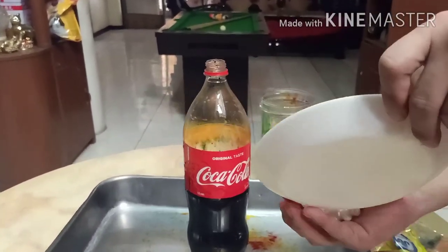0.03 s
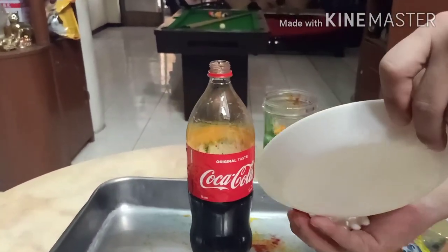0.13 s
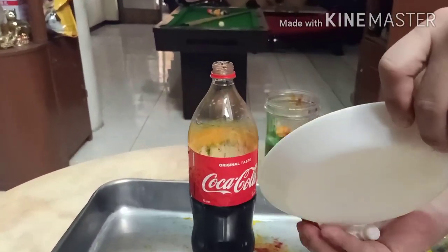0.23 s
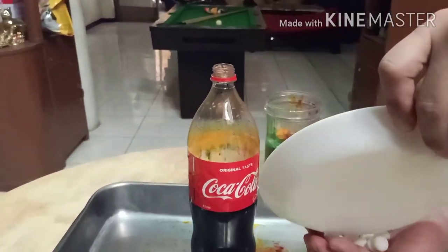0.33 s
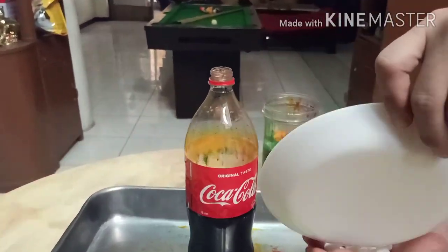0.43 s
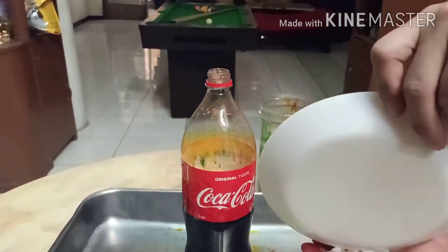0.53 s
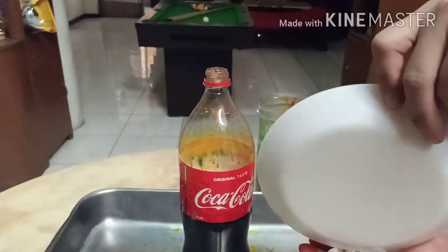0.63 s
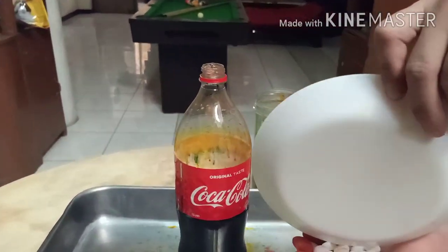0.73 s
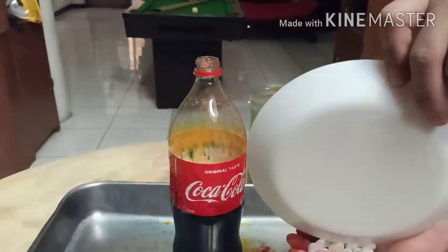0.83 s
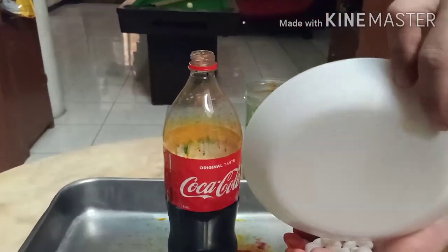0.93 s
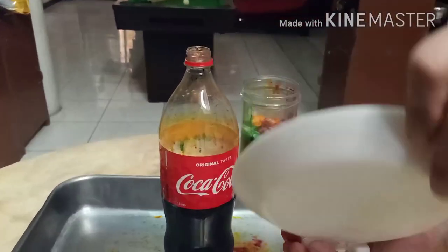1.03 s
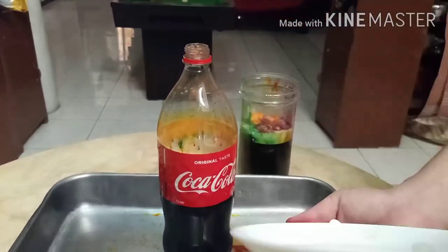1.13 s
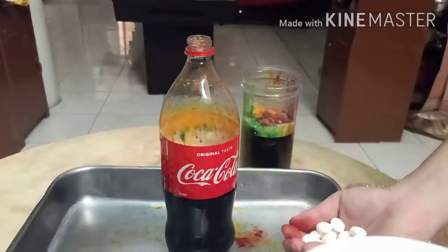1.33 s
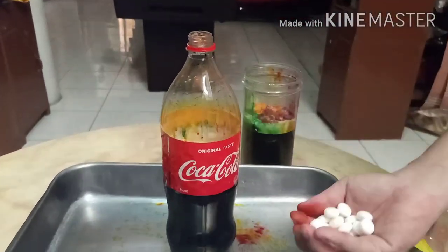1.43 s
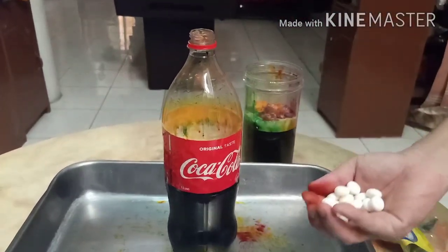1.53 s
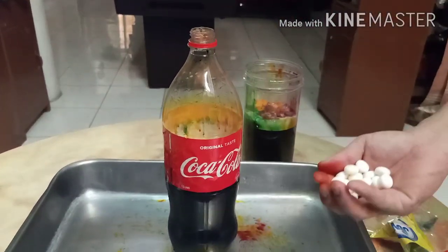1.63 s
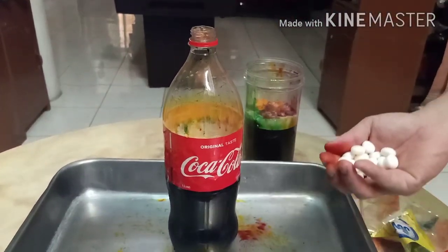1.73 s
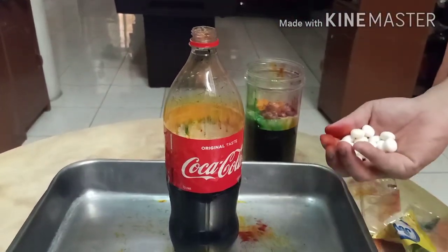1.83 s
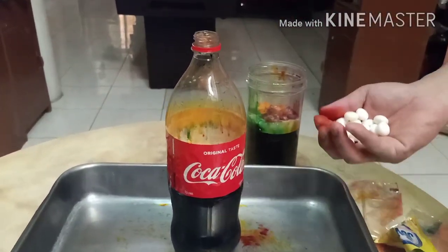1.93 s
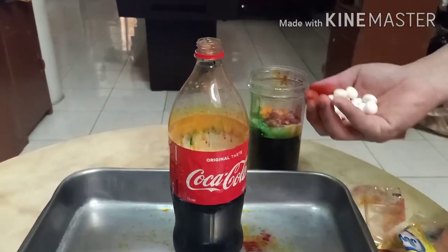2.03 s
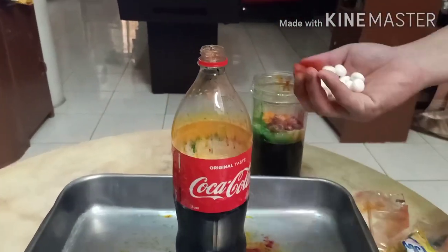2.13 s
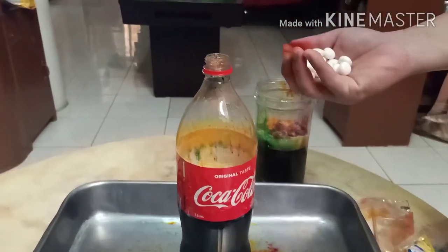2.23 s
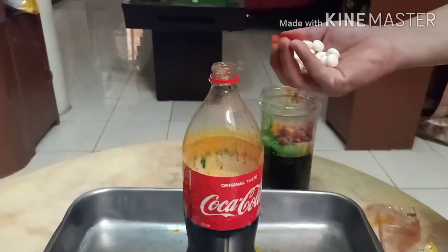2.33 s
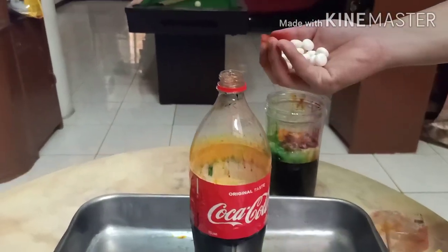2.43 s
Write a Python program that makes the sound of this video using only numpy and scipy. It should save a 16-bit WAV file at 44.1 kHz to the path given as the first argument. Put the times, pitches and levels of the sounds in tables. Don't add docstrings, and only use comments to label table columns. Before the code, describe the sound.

Small hard sweets slide and tick brightly against a hand-held ceramic plate, then the plate knocks onto a hard table and bounces; close stereo microphone in a tiled, echoing room with faint traffic rumble.

```python
import sys
import numpy as np
from scipy import signal
from scipy.fft import rfft, irfft
from scipy.io import wavfile
from scipy.ndimage import uniform_filter1d

SR = 44100
rng = np.random.default_rng(int(sys.argv[2]) if len(sys.argv) > 2 else 0)


def wrap_up_sound(samples):
    columns = np.atleast_2d(samples).T
    tamed = np.clip(columns, -1, 1)
    steps = np.round(tamed * 32767).astype(np.int16)
    wavfile.write(sys.argv[1], SR, steps)


def volts(x):
    e = np.asarray(x, float) / 20
    return 10 ** e


N = 108045
LAG_S, BEFORE_S = 0.0003, 0.05


def read(points, hz, axis=1):
    rows = np.transpose(points)
    return np.interp(np.log(hz + 1), np.log(rows[0] + 1), rows[axis])


def evened(x):
    return x / np.sqrt(np.mean(x ** 2) + 1e-20)


def empty_mix():
    return np.zeros((2, N + round(BEFORE_S * SR)))


def add(mix, s, sound):
    part = mix[:, round((s + LAG_S + BEFORE_S) * SR):][:, :sound.shape[1]]
    part += sound[:, :part.shape[1]]


# (frequency [Hz], likeness [0 to 1])
SAME = [(60, 0.96), (300, 0.92), (600, 0.66), (1200, 0.084), (15000, 0.021)]
# (frequency [Hz], left louder by [dB])
LEFT_DB = [(300, 0), (900, 0), (1650, 4), (3000, 3), (8000, 2)]


def pair(left, other, hz):
    same = np.clip(read(SAME, hz), 0, 1)
    tilt = volts(read(LEFT_DB, hz) / 2)
    right = same * left + np.sqrt(1 - same ** 2) * other
    return np.array([tilt * left, right / tilt])


def burst(colour, t60):
    t = np.arange(SR // 4) / SR
    hz = np.fft.rfftfreq(len(t), 1 / SR)
    noise = rfft(rng.standard_normal((2, len(t))))
    z = pair(*noise, hz) * volts(read(colour, hz))
    return evened(irfft(z, len(t))) * volts(-60 * t / t60) * np.minimum(t / 0.00013, 1)


def ring(modes, ports, spot_db, rise_s):
    grip_detune = 0.0057
    t = np.arange(SR // 4) / SR
    side = np.array([0.5, -0.5])[:, None, None]
    hz, db, t60 = np.transpose(modes)[:, :, None]
    chance = spot_db * rng.standard_normal((5,) + db.shape)
    hz = hz * (1 + grip_detune * chance[3] / 3)
    t60 = t60 * volts(chance[4] / 2)
    balance = side * (read(ports, hz, axis=2) + chance[1] / 2)
    db = db + chance[0] + balance - 60 * t / np.abs(t60)
    lead = side * (read(ports, hz) + chance[2] / 10)
    sines = volts(db) * np.sin(2 * np.pi * hz * t + lead)
    return -sines.sum(1) * (1 - np.exp(-(t / rise_s) ** 2))


def hiss(colour, patchy_db):
    frames, hz = N // 256 + 5, np.fft.rfftfreq(1024, 1 / SR)
    a, b, c, d, patches = rng.standard_normal((frames, 513, 5)).T
    patches = uniform_filter1d(patches, size=5, axis=0)
    patches = evened(uniform_filter1d(patches, size=8, axis=1))
    shape = volts(read(colour, hz)[:, None] + patchy_db * patches)
    z = pair(a + 1j * b, c + 1j * d, hz[:, None]) * shape
    return evened(signal.istft(z, nperseg=1024, noverlap=768)[1][:, :N])


# (frequency [Hz], level per Hz [dB])
AIR = [(300, -33.5), (500, -3.5), (1260, -13), (2200, -0.5), (3600, -12), (4340, -10.5), (5200, -15.5),
       (7500, -16), (16000, -24.5)]


def room_air():
    return volts(-56.5) * hiss(AIR, patchy_db=2.0)


# (frequency [Hz], level per Hz [dB])
RUMBLE = [(15, -62.5), (25, -37.5), (64, -12.5), (102, -6), (140, -0.5), (266, -15.5), (307, -5.5),
          (634, -32.5), (800, -25), (1040, -53), (1760, -120)]
# (time [s], level [dB])
TRAFFIC = [
    (0, -46.5),
    (.35, -50.5),
    (.55, -48.5),
    (.85, -50.5),
    (1.05, -53.5),
    (1.4, -51.5),
    (1.6, -57),
    (1.9, -50),
    (2.15, -49),
    (2.45, -54),
]


def traffic():
    t = np.arange(N) / SR
    return volts(np.interp(t, *np.transpose(TRAFFIC)) + 0.5) * hiss(RUMBLE, patchy_db=2.5)


# (time [s], pitch [Hz], level [dB])
DRONE = [
    (0.45, 76.2, -73),
    (0.676, 74.3, -50),
    (1.3, 73, -60.5),
]


def engine():
    t = np.arange(N) / SR
    s, hz, db = np.transpose(DRONE)
    turn = 2 * np.pi * np.cumsum(np.interp(t, s, hz)) / SR
    fade = np.clip(np.minimum(t - s[0], s[-1] - t) / 0.17, 0, 1)
    tone = np.sin(turn) + volts(-3) * np.sin(2 * turn)
    return np.sqrt(2) * fade * volts(np.interp(t, s, db)) * tone


def cricket():
    pitch_hz, width_hz, level_db = 4290, 17, -72
    chirps_per_s, chirp_at_s, weaker_from_s = 5.0, 1.37, 1.8
    t = np.arange(N) / SR
    turn = 2 * np.pi * pitch_hz * t
    wobble = uniform_filter1d(rng.standard_normal((2, N)), size=round(SR / width_hz / 2), axis=1)
    pulses = 1.2 + 0.45 * np.cos(2 * np.pi * chirps_per_s * (t - chirp_at_s))
    chirps = pulses * np.where(t < weaker_from_s, 1, 0.4)
    song = evened(wobble[0] * np.sin(turn) + wobble[1] * np.cos(turn))
    song = evened(song + 1.5 * np.sin(turn + 3 * np.sin(9 * t)))
    return volts(level_db) * chirps * song


# (frequency [Hz], time to fall 60 dB [s])
ROOM = [(100, 0.78), (400, 0.52), (1000, 0.77), (2500, 0.68), (5000, 0.47), (9000, 0.53)]


def room(x):
    taps = rng.choice([-1., 1.], (2, SR)) * (rng.random((2, SR)) < 0.06)
    taps[:, :round(0.006 * SR)] = 0
    hz, t, z = signal.stft(taps, SR, nperseg=256)
    z = pair(z[0], z[1], hz[:, None])
    dying = volts(-60 * t / read(ROOM, hz)[:, None])
    tail = signal.istft(z * dying, SR, nperseg=256)[1]
    tails = (tail, np.roll(tail, 300, axis=1))
    echoes = sum(signal.fftconvolve(v[None], k, axes=1) for v, k in zip(x, tails))
    return echoes[:, :x.shape[1]] / np.linalg.norm(tail)


# (frequency [Hz], left leads by [radians], left louder by [dB])
KNOCK_PORTS = [(292, 0.046, -0.5), (600, .25, -4.5), (1060, 0.38, 2), (1670, 2.3, 10), (2150, 2.67, 7),
               (4560, 2, 8), (7000, 3.3, 8.5)]
# (time [s], level [dB], snap [dB], thud [dB], crack [dB])
KNOCKS = [
    (1.8104, -2.5, 9, -18, -19),
    (2.0628, -41.5, -11, -6, -11.5),
    (2.0959, -13.5, 8.5, -13.5, -14.5),
    (2.1034, -20, 6, -11.5, -21),
    (2.112, -14, 2.5, -14.5, -11),
    (2.1169, -24.5, 5, -5.5, -21.5),
]
# (frequency [Hz], level [dB], time to fall 60 dB [s])
SNAP = [(1072, -1.5, 0.0052), (1654, -2.5, 0.004), (2090, -6, 0.0045), (2894, -14, 0.0055),
        (3820, -23, 0.0064), (4610, -26, 0.013), (6700, -45, 0.011)]
RIM_SNAP = [(966, -6, 0.0068), (1382, -7.5, 0.0077), (2286, -4, 0.0084), (3040, -15, 0.0071),
            (4570, -17, 0.0085), (6730, -28, 0.013)]
# (frequency [Hz], level [dB], time to fall 60 dB [s])
TABLE = [(84, -8.5, 0.14), (135.4, -7.5, 0.13), (201, -2.5, 0.097), (288, -7.5, 0.14), (416, -6.5, 0.06),
         (492, -12, 0.07), (575, 0.5, 0.045), (655, -4.5, 0.052), (770, -13, 0.019), (953, 4, 0.02),
         (1204, -1, 0.026), (1421, -1.5, 0.077), (1629, -9, 0.22)]
RIM_TABLE = [(79.5, -9.5, 0.25), (137, -9.5, .15), (200, -4, 0.12), (290, -2.5, 0.23), (421, -9.5, 0.1),
             (489, -3, 0.15), (588, -3.5, 0.064), (664, -5.5, 0.11), (742, -4, 0.079), (915.4, -4.5, 0.1),
             (1350, -7, 0.03), (2200, -13, .06), (2290, -11, .045)]
# (frequency [Hz], level [dB])
CRACK = [(70, -52.5), (150, -9.5), (500, -3), (1600, -8.5), (3300, -15), (5000, -23.5), (7500, -21.5),
         (16000, -33.5)]
# (frequency [Hz], level [dB])
RATTLE = [(200, -14), (600, -3), (1100, -1), (2000, -1.5), (3200, -8), (5000, -17), (7500, -20),
          (16000, -40)]


def set_down():
    out = empty_mix()
    for s, db, snap_db, thud_db, crack_db in KNOCKS:
        first = s == KNOCKS[0][0]
        snap = ring(SNAP if first else RIM_SNAP, KNOCK_PORTS, 2.1, 0.00061)
        thud = ring(TABLE if first else RIM_TABLE, KNOCK_PORTS, 2.0, 0.0029)
        rattle = volts(-29) * burst(RATTLE, 0.3)
        crack = burst(CRACK, 0.081) + volts(6.5) * burst(CRACK, 0.013)
        hit = volts(snap_db) * snap + volts(thud_db) * thud + rattle + volts(crack_db) * crack
        add(out, s, volts(db) * hit)
    return out


# (frequency [Hz], left leads by [radians], left louder by [dB])
TICK_PORTS = [(1000, 0.7, -3.5), (1650, 1.5, 7.5), (2300, -2, 3.5), (2800, 1.81, 2), (4710, 2.5, 13),
              (5310, -1, 7.5), (6650, 2.3, 5), (14600, -1.8, 1.5)]
# (time [s], level [dB], pitch [Hz])
PALM = [
    (.159, -36.5, 1210),
    (0.476, -40, 1125),
    (0.606, -39, 1030),
    (1.091, -46, 628),
]


def palm_taps(out):
    for s, db, hz in PALM:
        add(out, s, ring([(hz, db, 0.03)], TICK_PORTS, 0, 0.00051))


# (frequency [Hz], level [dB])
CLICK = [(500, -35), (1000, -14.5), (2500, -9.5), (4100, -13), (5200, -9), (7100, -6), (10000, -3),
         (16000, -23)]
# (time [s], level [dB])
SLIDE = [
    (0, -75),
    (.04, -37.5),
    (.07, -47.5),
    (.11, -42),
    (.15, -46),
    (.2, -65),
]


def slide(out):
    t = np.arange(SR // 4) / SR
    grit = volts(24 * uniform_filter1d(rng.standard_normal(len(t)), size=120))
    level = volts(np.interp(t, *np.transpose(SLIDE), right=-120))
    add(out, 0, level * grit * burst(CLICK, 91))


# (time [s], level [dB], low ring [dB], middle ring [dB], click [dB])
TICKS = [(0.0659, -32, -6.5, -3, 0), (0.0837, -32.5, -6, 0, 3.5), (0.2115, -29, -15, -8, -4),
         (0.2218, -20.5, -6.5, -4, -2.5), (0.2439, -11, -10.5, -4.5, -10), (0.2642, -11, -8, -8, -4),
         (0.2672, -20, -8.5, -7, -9), (0.2732, -16, -9.5, -7, -8.5), (0.3174, -36, -6, -8, 0),
         (0.3361, -18.5, -8, -8, -8), (0.4002, -15.5, -7, -6, -10), (0.417, -33, -4, -15, -6),
         (0.4752, -27.5, -6.5, -2, -6), (0.4823, -24, -6, -1.5, -7.5), (0.5047, -41.5, 3.5, -17, 4),
         (0.5813, -21.5, 0, -3, -3.5), (0.605, -34, 7, -6.5, -16), (0.8934, -55, 3, -8, 11),
         (1.0754, -17, -12, -5, -19), (1.0893, -23.5, -5.5, 2, -9.5), (1.0918, -27.5, -4.5, -9, -11)]
EARLIER_TICK = (-0.05, -18, 2, -5, -3.5)
TURN_DB = [-2.5, 0.8, -0.1, -1.5, -3, -5, -2, -3, -3, 0.1, -3.5, 1, 0, -3.5, -0.5, -4, 1, -2, 1, 6.5, 1,
           -2.5]
# (frequency [Hz], level [dB], time to fall 60 dB [s], place in its twin pair)
PLATE_LOW = [(1653, -12, 0.075, -0.84), (2380, -11.5, 0.04, 1), (2854, -7.5, 0.031, 0.96),
             (2848, -1.5, 0.068, -0.085), (2875, -9, .05, -1.1), (3160, -7.5, 0.047, 0.98)]
PLATE_MID = [(3630, -18, 0.026, -1), (4197, -9.5, 0.047, -0.46), (4430, -11.5, 0.045, 1),
             (4513, -17, 0.047, -1), (5240, 1, 0.027, -0.82), (5590, -6, .035, 0.97), (5900, -15, .025, 1)]
PLATE_HIGH = [(6455, -10, 0.029, -1), (6473, -3, 0.026, -1.8), (6530, -4, 0.04, -1), (6660, -0.5, 0.032, 1),
              (6700, -8.5, 0.017, 0), (6870, -11, 0.012, 0.95), (7250, -13, .022, 0.14),
              (7970, -2, 0.022, -1)]
PLATE_TOP = [(8400, -17, 0.02, 0), (9300, -9.5, 0.022, 0.00082), (10750, -17.5, 0.025, 0),
             (12700, -18, 0.03, 0.0015), (14760, -16, .035, 0)]


def plate_ticks(out):
    strikes = [EARLIER_TICK] + list(TICKS)
    for (s, db, low_db, mid_db, click_db), turn_db in zip(strikes, TURN_DB):
        groups = ((PLATE_LOW, low_db), (PLATE_MID, mid_db), (PLATE_HIGH, 0), (PLATE_TOP, 0))
        struck = []
        for modes, group_db in groups:
            for hz, mode_db, t60, place in modes:
                struck.append((hz, mode_db + group_db + place * turn_db, t60))
        body = ring(struck, TICK_PORTS, 1.2, 0.00068)
        click = volts(click_db + 6) * burst(CLICK, 0.019)
        wash = volts(-16.5) * burst(CLICK, 0.081)
        add(out, s, volts(db - 1.5) * (body + click + wash))


def sweets():
    out = empty_mix()
    plate_ticks(out)
    palm_taps(out)
    slide(out)
    return out


def scene():
    background = traffic() + engine() + room_air() + cricket()
    ticks, knocks = sweets(), set_down()
    echoes = room(volts(-11) * ticks + volts(-12) * knocks)
    return (ticks + knocks + echoes)[:, -N:] + background


def gate(top, whole):
    neighbours_db, mask_db = -1.5, -61
    z = signal.stft(top, nperseg=512)[2]
    loud = abs(signal.stft(whole, nperseg=512)[2]).max(axis=(0, 1))
    power = (abs(z) ** 2).mean(0)
    level = np.sqrt(abs(uniform_filter1d(power, size=3, axis=1)))
    neighbours = uniform_filter1d(level, size=25, axis=0)
    ratio = level / (volts(neighbours_db) * neighbours + volts(mask_db) * loud)
    kept = 1.5 * ratio ** 6 / (1 + ratio ** 6)
    return signal.istft(z * kept, nperseg=512)[1][:, :N]


def band_limit(x):
    return signal.sosfilt(signal.butter(12, 16450, fs=SR, output="sos"), x)


def record(dry):
    low_hz, edge_hz, ceiling = 56, 7500, 0.9
    dry = ceiling * np.tanh(dry / ceiling)
    low = signal.sosfilt(signal.cheby2(10, 45, edge_hz * 1.12, fs=SR, output="sos"), dry)
    top = signal.sosfilt(signal.butter(6, edge_hz, "high", fs=SR, output="sos"), dry)
    bass_cut = signal.butter(3, low_hz, "high", fs=SR, output="sos")
    heard = signal.sosfilt(bass_cut, low + gate(volts(-22) * top, low))
    return band_limit(heard)


dry = scene()
out = record(dry)
wrap_up_sound(out)
```